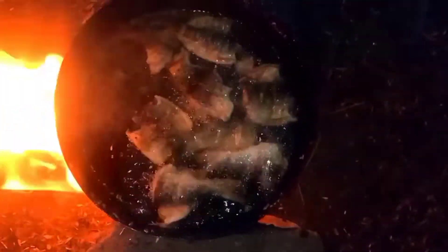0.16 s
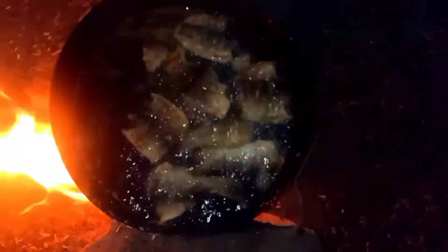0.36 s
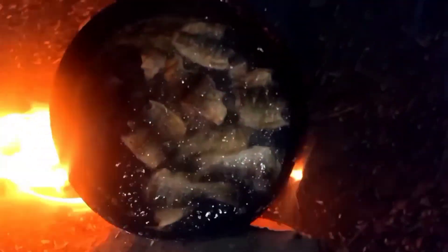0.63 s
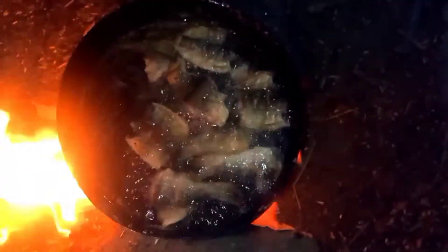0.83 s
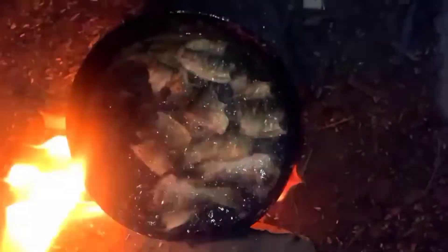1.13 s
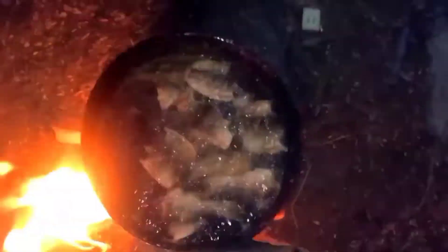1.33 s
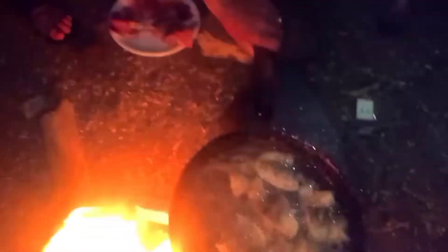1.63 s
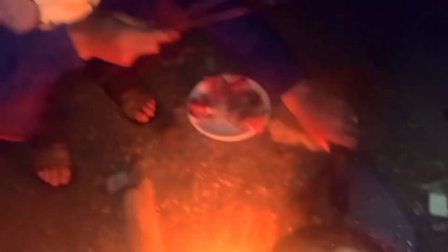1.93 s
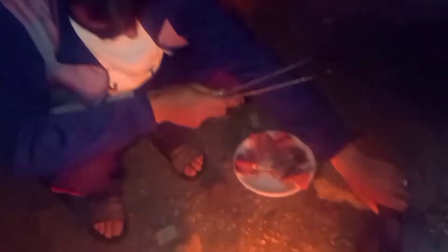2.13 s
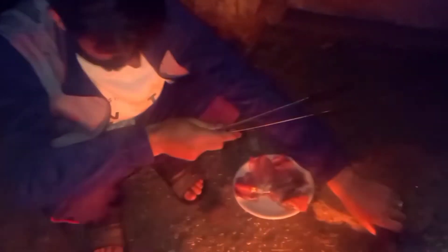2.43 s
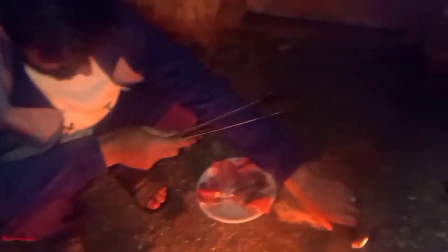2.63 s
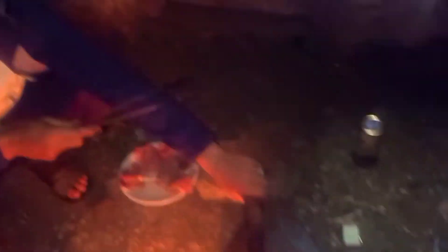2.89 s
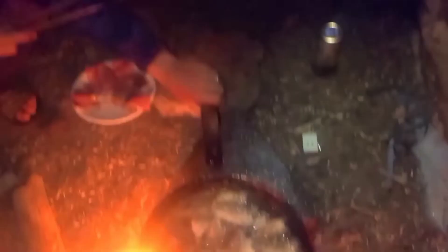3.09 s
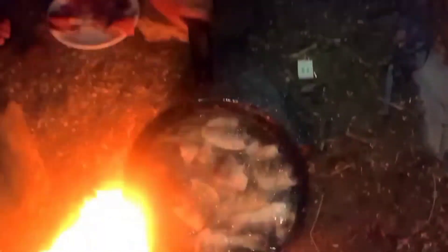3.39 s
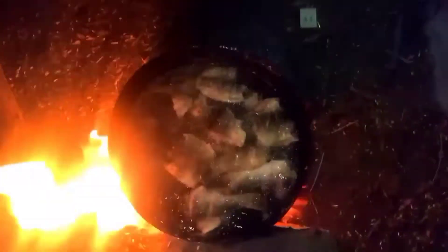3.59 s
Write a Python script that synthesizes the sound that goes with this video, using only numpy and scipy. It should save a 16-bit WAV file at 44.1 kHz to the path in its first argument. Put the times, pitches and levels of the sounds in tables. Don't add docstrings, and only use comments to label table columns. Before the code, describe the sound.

Fish frying in a wide pan of oil: continuous dense crackling sizzle with irregular snappy pops, wet plops and spits, over a faint low fire rumble; outdoors, close hand-held stereo recorder turning away midway and back.

```python
import sys
import numpy as np
from scipy import signal
from scipy.fft import rfft, irfft
from scipy.io import wavfile

SR = 44100
rng = np.random.default_rng(int(sys.argv[2]) if len(sys.argv) > 2 else 0)


def nominal_scale(level):
    x = np.asarray(level, float) / 20
    return 10 ** x


def bounce(signal):
    frames = np.transpose(np.atleast_2d(signal))
    limited = np.clip(frames, -1, 1)
    pcm = np.round(limited * 32767).astype(np.int16)
    wavfile.write(sys.argv[1], SR, pcm)


N = 165375

# time in seconds, vigour in dB,
# turn from 0 (facing the pan) to 1 (away).
MOTION = [(0, -42, 0.21), (.15, -42, 0.11), (.4, -42, 0.061), (.6, -44, 0.037), (1, -42, 0.049),
          (1.249, -45.5, 0.042), (1.55, -44, 0.6), (1.9, -42.5, 1), (2.3, -42, 1), (2.6, -42.5, 1),
          (2.85, -43, 0.82), (3.151, -42.5, 0.86), (3.402, -44.5, 0.3), (3.601, -41.5, 0.36),
          (3.75, -45, 0.12)]
# start in seconds, length in seconds, rise in dB,
# centre in Hz.
SWELLS = [(.17, 0.014, 2, 2000), (0.224, 0.036, 5, 2250), (0.296, 0.034, 5.5, 2500),
          (0.447, 0.031, 5, 2720), (0.568, 0.0068, 15, 2850), (0.59, 0.014, 5.5, 2400),
          (0.876, 0.04, 7.5, 1500), (1.205, 0.048, 4.5, 2190), (1.683, 0.021, 5.5, 1900),
          (2.053, 0.049, 8, 2480), (2.428, .05, 3.5, 2070), (2.75, 0.029, 12.5, 1620),
          (2.942, .03, 3, 2100), (3.207, 0.029, 12, 2600), (3.555, 0.015, 8, 2050)]
# start in seconds, peak in dB, pitch in Hz.
BURSTS = [(0.159, -26, 2710), (0.1765, -17.5, 2570), (0.2317, -25, 2240), (0.2972, -18, 2600),
          (0.3148, -30, 2600), (0.3701, -34, 2860), (0.401, -37, 2510), (0.419, -26, 2220),
          (0.44, -23, 2620), (0.4673, -26, 2600), (0.5777, -17, 2500), (0.608, -21, 2500),
          (0.6828, -36, 3100), (0.7645, -33, 2370), (0.774, -31, 2960), (0.8124, -18, 3040),
          (0.818, -22, 2540), (0.852, -25, 2520), (0.8766, -29, 2600), (0.9171, -21.5, 2520),
          (0.9558, -22, 2300), (1.0385, -20.5, 2560), (1.0994, -46, 2700), (1.1383, -38, 2340),
          (1.2057, -18, 1950), (1.2216, -22, 2560), (1.2441, -19, 2240), (1.3919, -23.5, 2170),
          (1.5753, -36, 2450), (1.6881, -23, 2260), (1.7323, -27, 2310), (1.9016, -43, 2040),
          (1.9146, -32, 2000), (1.9774, -20.5, 2500), (2.0647, -15, 2240), (2.278, -33, 2440),
          (2.333, -39, 2700), (2.3955, -24, 2700), (2.435, -24, 2340), (2.4683, -19, 2250),
          (2.5207, -24, 2620), (2.61, -23, 2640), (2.6863, -43, 2280), (2.7616, -28, 1690),
          (2.7633, -23, 2600), (2.9073, -43, 2600), (2.9139, -23, 2800), (2.9607, -25, 2100),
          (2.9672, -23.5, 2170), (2.9976, -27, 2200), (3.1677, -28.5, 2340), (3.2111, -28, 2930),
          (3.226, -34, 2910), (3.3483, -26, 2860), (3.3705, -31, 2860), (3.4665, -23, 2800),
          (3.557, -17, 3150), (3.6235, -20.5, 2000), (3.6546, -21, 2670), (3.7232, -22.5, 2870)]
# start in seconds, peak in dB, pitch in Hz.
PLOPS = [(0.057, -43, 644), (0.158, -54, 816), (0.176, -38, 859), (0.19, -32, 1170), (0.315, -39.5, 650),
         (0.377, -31, 1400), (0.445, -45, 1020), (0.576, -21, 1350), (0.619, -27, 1240), (0.699, -41, 1250),
         (0.819, -27, 1310), (0.888, -39, 1700), (0.888, -22, 1190), (1.178, -55, 1240), (1.203, -37, 1280),
         (1.48, -32, 1450), (1.524, -29.5, 1310), (1.65, -39, 1410), (1.691, -27, 1500), (1.912, -32, 1550),
         (1.972, -33.5, 1630), (1.984, -34.5, 840), (2.021, -34.5, 869), (2.145, -32.5, 1430),
         (2.159, -36, 570), (2.262, -37, 1190), (2.465, -28.5, 1680), (2.513, -41, 690), (2.613, -36, 900),
         (2.686, -34.5, 700), (2.755, -44, 1700), (2.756, -25.5, 1100), (2.94, -28.5, 1210),
         (2.965, -33.5, 1070), (3.037, -40, 700), (3.126, -36.5, 810), (3.207, -30.5, 1100),
         (3.346, -34.5, 950), (3.564, -25, 1020), (3.627, -35, 700)]
# start in seconds, peak in dB, pitch in Hz, left over right in dB.
SPITS = [(0.0518, -49, 5050, 4.0), (0.0583, -41, 5610, 6.5), (0.1082, -38, 4660, 4.0),
         (0.1311, -37, 5900, 7.0), (0.1615, -40, 6790, 8.0), (0.1765, -34, 6070, 6.0),
         (0.2319, -41, 5970, 5.5), (0.2833, -43, 5730, 6.0), (0.2972, -39, 5010, 5.0),
         (0.3461, -44, 5580, 3), (0.4179, -26, 6150, 3), (0.4678, -38, 4520, 2), (0.5761, -21, 6060, 0),
         (0.819, -36, 5260, 8.0), (0.8395, -33.5, 5520, -1), (0.9472, -32.5, 6030, -3),
         (1.041, -40, 6160, 2), (1.0994, -40, 5110, 6.0), (1.1243, -40, 5590, 5.0), (1.1643, -38, 6090, 3),
         (1.1897, -34, 4900, 7.5), (1.3299, -46, 5380, 6.0), (1.6501, -45, 5960, 7.0),
         (1.8831, -42, 5560, 6.0), (2.0637, -39, 7130, 7.0), (2.2263, -39, 5410, 7.0),
         (2.5601, -41, 5430, 7.0), (2.577, -43, 7250, 7.0), (2.7621, -30.5, 7090, 13),
         (3.1832, -39, 4800, 7.5), (3.2101, -35, 5760, 7.0), (3.3468, -31, 6300, 0), (3.3662, -41, 6050, 2),
         (3.3897, -38, 5080, 9), (3.5079, -45, 4920, 6.5), (3.5593, -32, 5640, 1), (3.5658, -33, 5970, -5),
         (3.682, -44, 5950, 9)]
# frequency in Hz, left in dB, right in dB.
FACING_PATH = [(230, -16, -23), (580, -6.5, -7), (1560, -5.5, -2.5), (2600, 3.5, 2.5), (3520, -6, -4),
               (6470, -10.5, -16.5), (10020, -20, -27), (15600, -34.5, -23)]
# frequency in Hz, left in dB, right in dB.
AWAY_PATH = [(257, -24, -20), (620, -9, -9.5), (1545, -10.5, -8.5), (2500, 0, 5.5), (3540, -10, -4.5),
             (6760, -14.5, -26.5), (10100, -28, -30.5), (15500, -36, -26.5)]
# frequency in Hz, width in Hz, left in dB, right in dB.
CAVITIES = [(2500, 540, -1, 1), (11360, 430, 4, -4.5), (14200, 550, 8, 1.5)]
# frequency in Hz, density in dB per Hz.
FLAME_SPECTRUM = [(15, -40), (25, -18), (75, -3.5), (124, -6.5), (168, 0), (274, -13.5), (409, -11.5),
                  (500, -2), (650, -33), (1100, -120)]
# time in seconds, rise in dB.
PUFFS = [
    (.62, -0.5),
    (0.881, 9),
    (1.328, 2),
    (1.571, 5),
    (2.33, -4),
    (2.679, 4),
    (3.451, 4),
    (3.68, 4),
]
PUFF_S = 0.0236


def rms_one(x):
    return x / np.sqrt(np.mean(x ** 2) + 1e-20)


def drift(rate):
    r = np.exp(-2 * np.pi * rate / SR)
    slow = signal.lfilter([1], [1, -2 * r, r * r], rng.standard_normal(N + SR))
    return rms_one(slow[SR:])


def colour(x, db_at):
    size = 4096
    hz = np.maximum(np.fft.rfftfreq(size, 1 / SR), 10)
    cepstrum = irfft(np.log(nominal_scale(db_at(hz))))
    cepstrum[1:size // 2] *= 2
    cepstrum[size // 2 + 1:] = 0
    response = irfft(np.exp(rfft(cepstrum)))
    return signal.fftconvolve(x, response)[:N]


def table_db(rows, hz, column):
    rows = np.array(rows)
    return np.interp(np.log(hz), np.log(rows[:, 0]), rows[:, column])


def motion(s):
    t, db, turn = np.transpose(MOTION)
    return np.interp(s, t, db), np.clip(np.interp(s, t, turn), 0, 1)


def lag_at(s, place):
    facing_s, away_s, spread_s = .00031, .00008, .00013
    return facing_s + (away_s - facing_s) * motion(s)[1] + spread_s * place


def add(out, s, shapes, place, pan_db=0):
    steps = np.arange(shapes.shape[1])
    arrivals = [(s, nominal_scale(pan_db / 2)), (s + lag_at(s, place), nominal_scale(-pan_db / 2))]
    for side, (at, gain) in enumerate(arrivals):
        index = np.round(at * SR).astype(int)[:, None] + steps
        index = np.clip(index, 0, N - 1)
        weighted = shapes * np.reshape(gain, (-1, 1))
        out[side] += np.bincount(index.ravel(), weighted.ravel(), N)
    return out


def bubble(hz, cycles, rise, size):
    turns = np.arange(size) / SR * hz[:, None]
    swell = turns / cycles * 4.1
    glide = 1 + rise * turns / cycles
    return swell * np.exp(1 - swell) * np.sin(2 * np.pi * turns * glide)


def swell_db(hz):
    rise_s, fall_s, octaves = 0.011, 0.012, 0.84
    t = np.arange(N) / SR
    out = np.zeros(N)
    for s, length, db, centre_hz in SWELLS:
        opening = (t - s) / rise_s
        closing = 1 + (s + length - t) / fall_s
        shape = np.clip(np.minimum(opening, closing), 0, 1)
        out += shape * db * np.exp(-.5 * (np.log2(hz / centre_hz) / octaves) ** 2)
    return out


def crackle():
    hiss_db, snap_db, size_db = 9.5, 13, 2.5
    snaps_per_s = 2800
    clump_db, own_clump_db = 1.15, 1.43
    s = np.arange(N) / SR
    together = clump_db * (drift(7.1) + drift(45))
    vigour = nominal_scale(motion(s)[0])
    edges_hz = 220 * 2 ** np.arange(0, 6.6, .5)
    hiss_noise = nominal_scale(hiss_db) * rng.standard_normal((N, 1))
    hiss = add(np.zeros((2, N)), s, hiss_noise, rng.standard_normal(N))
    out = 0
    for low, high in zip(edges_hz, edges_hz[1:]):
        hz = np.sqrt(low * high)
        clumps = nominal_scale(together + own_clump_db * (drift(6) + drift(30)))
        rate = snaps_per_s * (hz / 6000) ** 1.1
        sizes = nominal_scale(size_db * np.minimum(rng.exponential(1, N), 5)) * rng.choice([-1, 1], N)
        happens = rng.random(N) < rate * clumps / SR
        snaps = rms_one(sizes * happens * np.sqrt(clumps))
        born, place = snaps != 0, rng.standard_normal(N)
        both = add(hiss.copy(), s[born], nominal_scale(snap_db) * snaps[born, None], place[born])
        band = signal.butter(2, [low, high], "band", fs=SR, output="sos")
        out = out + signal.sosfilt(band, both * nominal_scale(swell_db(hz)) * vigour) * .9
    return out


def bursts():
    level_db, fade_db, follow_db = -4.5, -8, -11.5
    run_s, pitch_scatter, cycles = .014, 0.093, 4.5
    s, db, hz = np.transpose(BURSTS)[:, :, None]
    draw = rng.random((len(BURSTS), 4, 6))
    run = np.arange(6) / 6
    follower = run > 0
    when = s + run_s * (run + follower * .15 * (draw[:, 0] - .5))
    gain = nominal_scale(db + level_db + fade_db * run + follower * (follow_db - 4.7 * draw[:, 1]))
    pitch = hz * np.exp(pitch_scatter * 2 * (draw[:, 2] - .5) * 2 * follower)
    shapes = bubble(pitch.ravel(), cycles, 0.017, size=200) * gain.reshape(-1, 1)
    return add(np.zeros((2, N)), when.ravel(), shapes, 3 * (draw[:, 3].ravel() - .5))


def plops():
    cycles, rise, level_db, second_db = 1.72, 0.07, 9, -7
    s, db, hz = np.transpose(PLOPS)
    draw = rng.random((len(s), 3))
    place = draw[:, 0] - .5
    first = bubble(hz, cycles, rise, size=600) * nominal_scale(db + level_db)[:, None]
    out = add(np.zeros((2, N)), s, first, place)
    second = bubble(hz * (0.62 + .5 * draw[:, 1]), cycles, rise, size=600)
    second = second * nominal_scale(db + level_db + second_db)[:, None]
    return add(out, s + 0.00286 + 0.00511 * draw[:, 2], second, place)


def spits():
    level_db, ring_db, spray_db, right_to_left_db = 22, -3, -7, 1
    spray_s, low_cut_hz = 0.0022, 5700
    s, db, hz, pan_db = np.transpose(SPITS)
    draw = rng.standard_normal((len(s), 601))
    place, noise = draw[:, 0], draw[:, 1:]
    t = np.arange(600) / SR
    droplets = noise ** 2 * np.sign(noise)
    shapes = nominal_scale(spray_db) * droplets * np.exp(-t / spray_s) * np.minimum(t / 0.00067, 1)
    shapes[:, 20] -= 1
    shapes[:, 20:] += nominal_scale(ring_db) * bubble(hz, 2.1, .05, size=580)
    shapes = signal.sosfilt(signal.butter(2, low_cut_hz, "high", fs=SR, output="sos"), shapes)
    shapes = shapes * nominal_scale(db + level_db)[:, None]
    return add(np.zeros((2, N)), s, shapes, place, pan_db + right_to_left_db)


def scatter(x):
    echo_db, decay_s, change_s = -8.5, 0.0084, .03
    t = np.arange(1200) / SR
    echoes = rng.standard_normal((8, len(t))) * np.exp(-t / decay_s) * (t > .0005)
    turns = (np.arange(N) / SR / change_s).astype(int)
    spot = rng.integers(0, 8, 1000)[turns % 1000]
    reflected = np.zeros(N)
    for k, echo in enumerate(echoes):
        reflected += signal.fftconvolve(x * (spot == k), echo / np.linalg.norm(echo))[:N]
    return x + nominal_scale(echo_db) * reflected


def ports(pan):
    turn = motion(np.arange(N) / SR)[1]
    out = []
    for side in (0, 1):
        def path_db(rows, hz):
            total = table_db(rows, hz, 1 + side)
            for row in CAVITIES:
                total = total + row[2 + side] * np.exp(-.5 * ((hz - row[0]) / row[1]) ** 2)
            return total - 12 * np.log2(np.maximum(250 / hz, 1))

        x = scatter(pan[side])
        facing = colour(x, lambda hz: path_db(FACING_PATH, hz))
        away = colour(x, lambda hz: path_db(AWAY_PATH, hz))
        out.append((1 - turn) * facing + turn * away)
    return np.array(out)


def flame_noise():
    def flame_db(hz):
        return table_db(FLAME_SPECTRUM, hz, 1) - 24 * np.log2(np.maximum(hz / 500, 1))

    return rms_one(colour(rng.standard_normal(N), flame_db))


def fire():
    level_db, side_db, flicker_db = -64, -14.5, 1.5
    t = np.arange(N) / SR
    mid = flame_noise()
    side = nominal_scale(side_db) * flame_noise()
    puffs_db = sum(db * np.exp(-.5 * ((t - s) / PUFF_S) ** 2) for s, db in PUFFS)
    return nominal_scale(level_db + puffs_db + flicker_db * drift(11.3)) * np.array([mid + side, mid - side])


def thumps():
    thump_hz, level_db = 75, -62
    s, db = np.transpose(PUFFS)
    pitch = thump_hz * rng.uniform(.8, 1.38, len(s))
    shapes = bubble(pitch, 2.5, .05, size=4000) * nominal_scale(level_db + db)[:, None]
    return add(np.zeros((2, N)), s - PUFF_S, shapes, 0 * s)


def scene():
    pan = crackle() + bursts() + plops() + spits()
    return ports(pan) + fire() + thumps()


def roll_off(x):
    return signal.sosfilt(signal.butter(12, 15860, fs=SR, output="sos"), x)


def record(dry):
    rounded = .26 * np.tanh(dry / .26)
    low_pass = signal.cheby2(12, 70, 16200, fs=SR, output="sos")
    return roll_off(signal.sosfilt(low_pass, rounded))


dry = scene()
out = record(dry)
bounce(out)
```